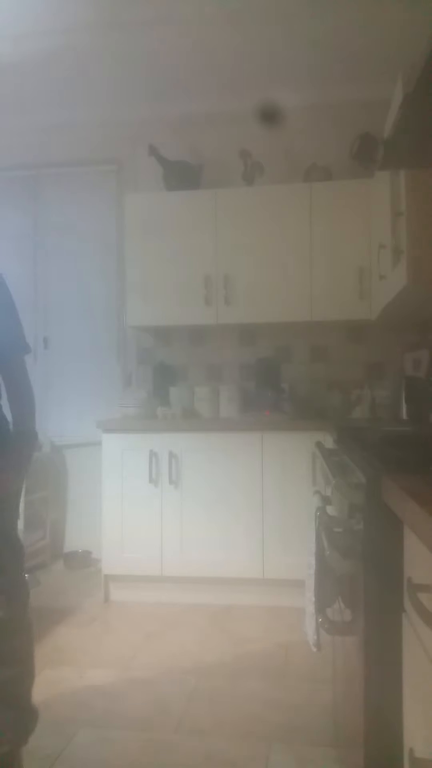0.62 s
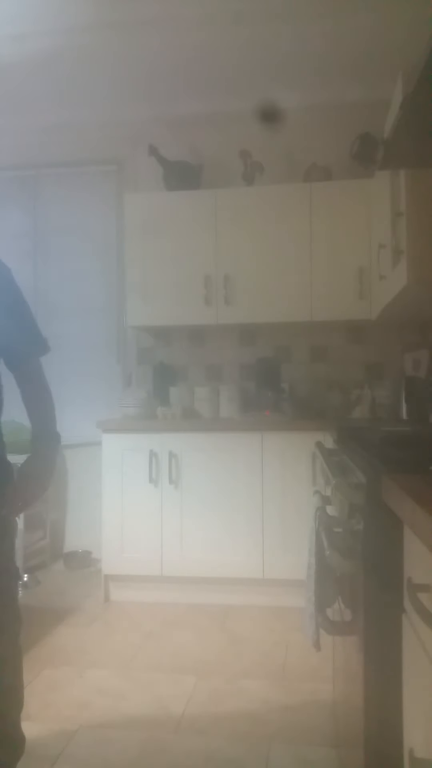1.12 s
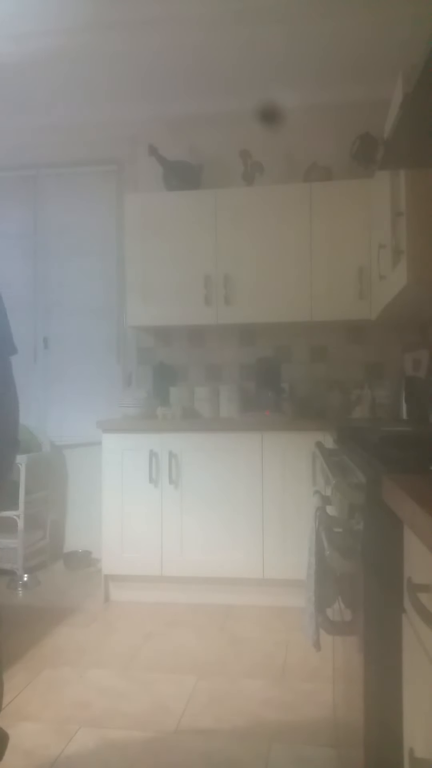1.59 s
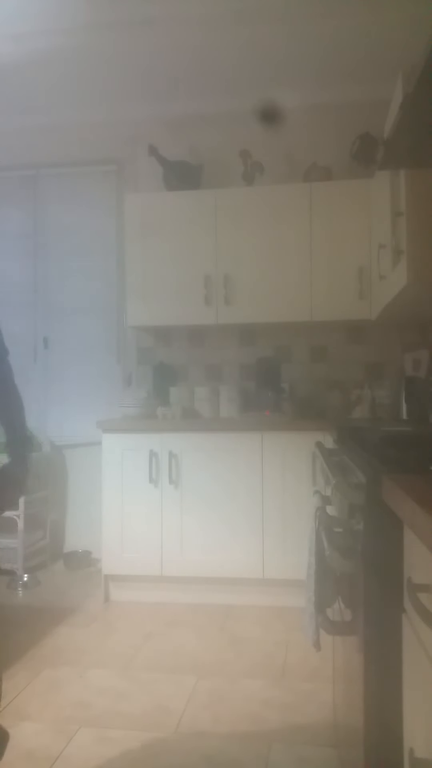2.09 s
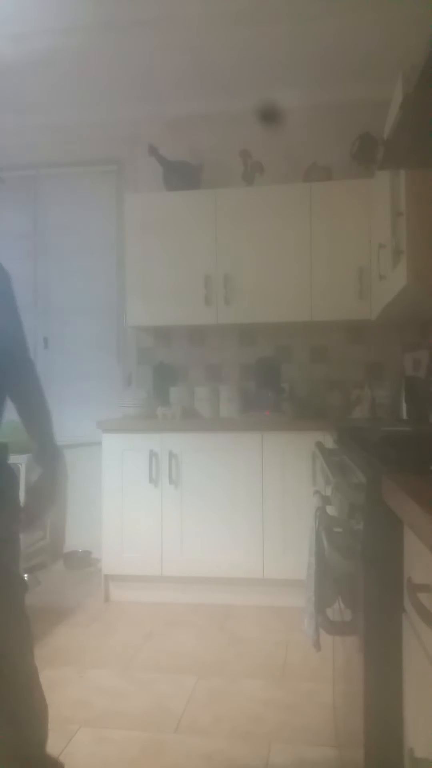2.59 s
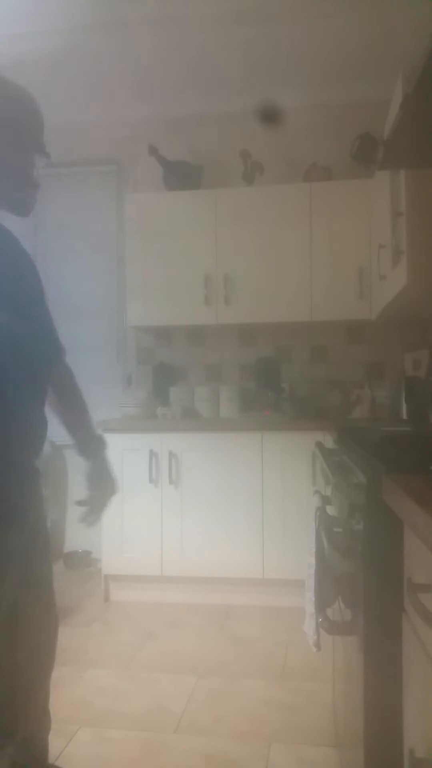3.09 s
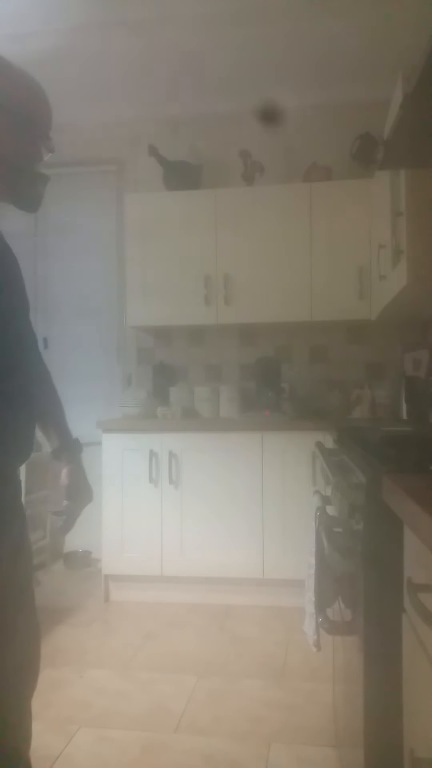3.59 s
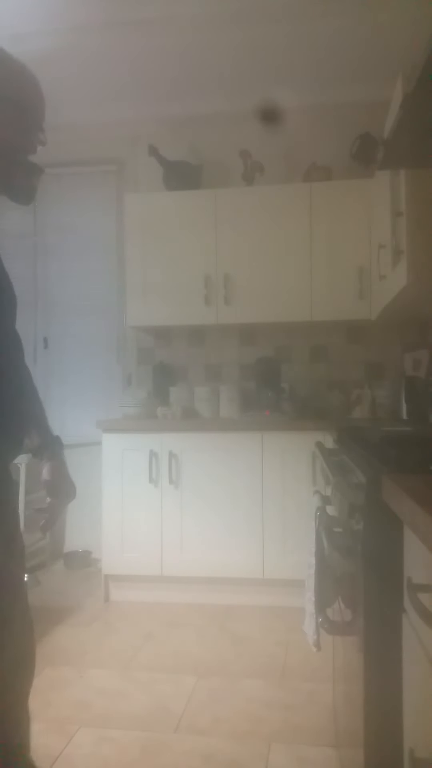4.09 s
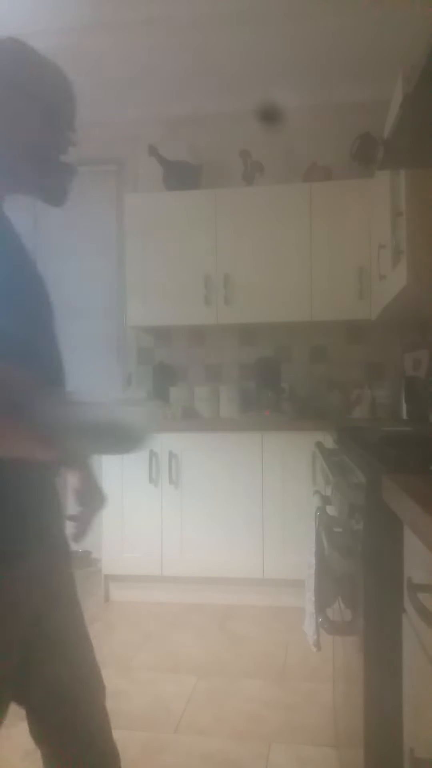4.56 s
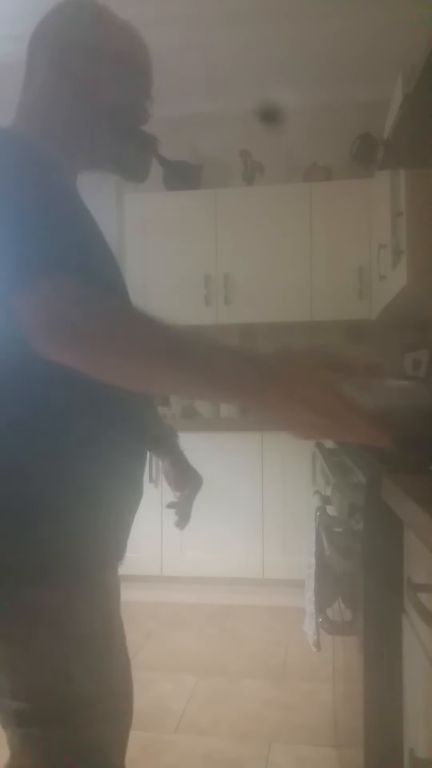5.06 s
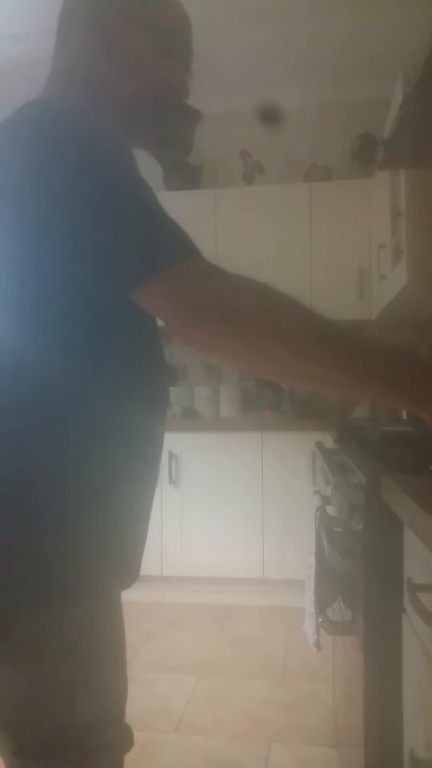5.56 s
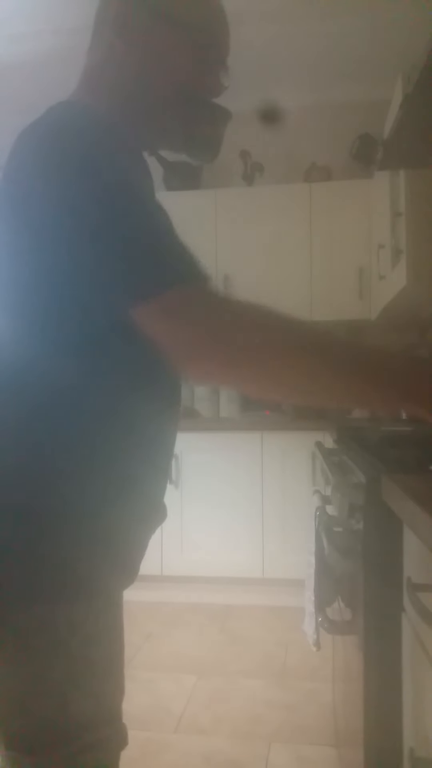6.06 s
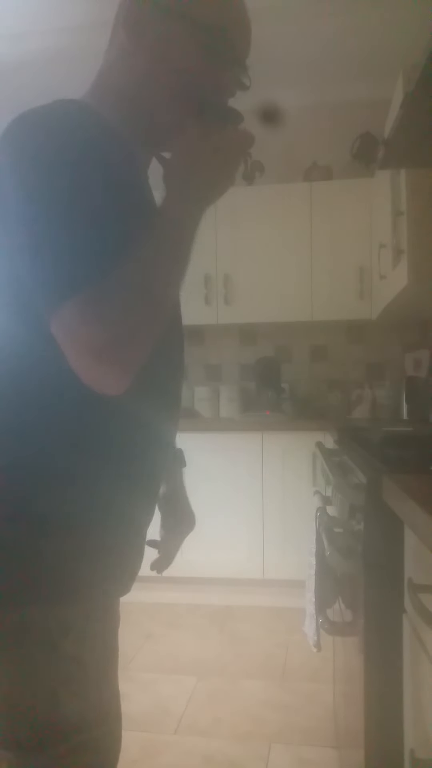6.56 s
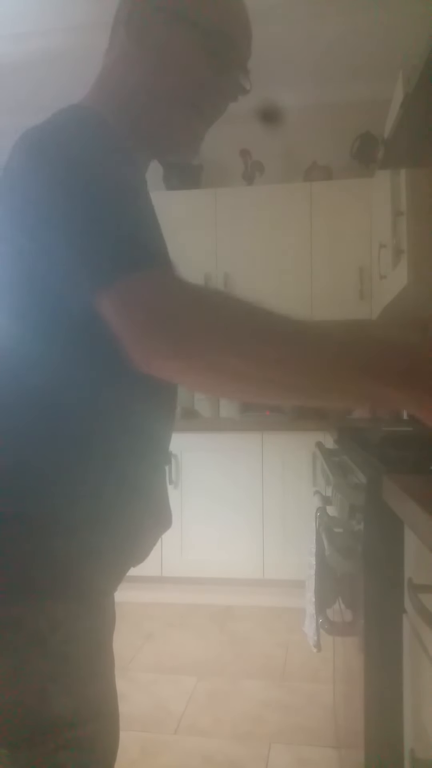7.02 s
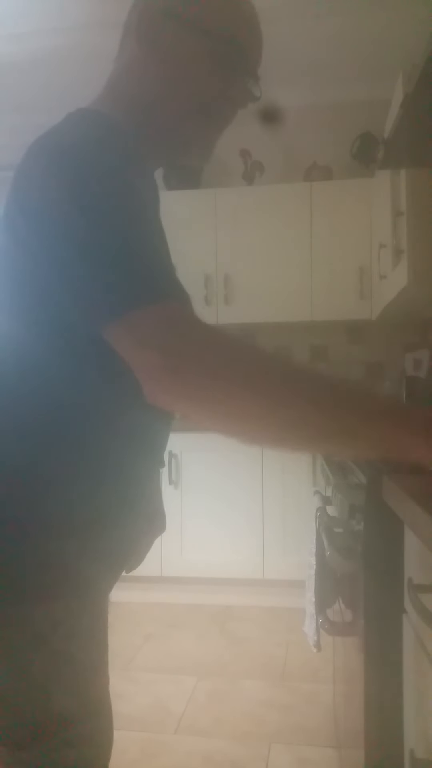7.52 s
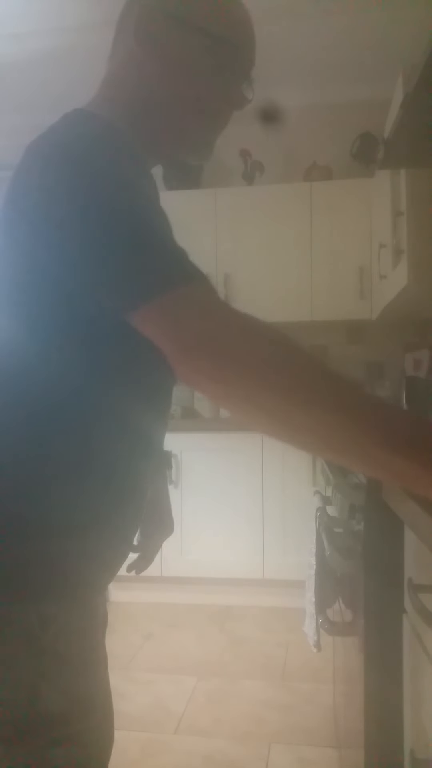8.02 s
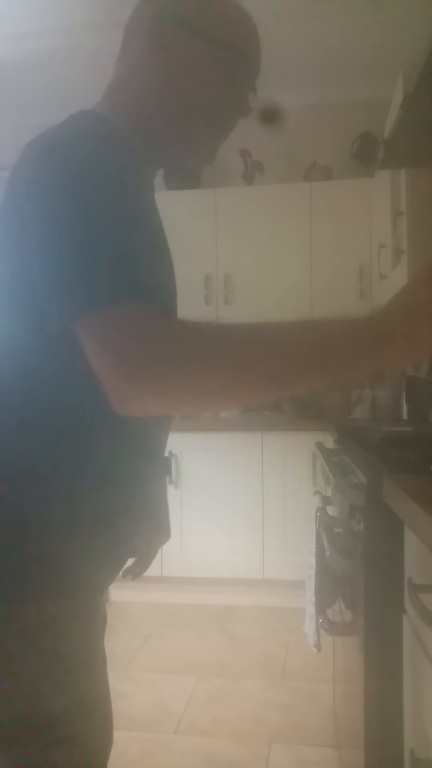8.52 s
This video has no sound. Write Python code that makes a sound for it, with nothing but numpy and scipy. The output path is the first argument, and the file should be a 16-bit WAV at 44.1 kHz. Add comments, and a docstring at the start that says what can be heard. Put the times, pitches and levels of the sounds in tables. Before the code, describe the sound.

In a quiet, echoey kitchen, three heel-and-sole strides approach, a dish lands ringing on the counter, a finger is sucked, and a utensil chatters.

```python
"""Room tone and microphone hiss fill a small tiled kitchen, with a thin high tick every 0.85 s.
Hard-soled shoes pace it, heel then sole, for three strides; two light taps and a far hollow knock fall
between. At the worktop a dull piece and a ringing dish are set down, a finger is sucked clean with four more
taps just before and during it, then a hand brushes the board and a utensil chatters among small blows.
Soft rubbing swells: cloth with body moves, at 8.04 s something sliding on the worktop. The phone stands
on that worktop, so blows reach it through the board too; bare walls ring on."""
import sys
import numpy as np
from scipy import signal
from scipy.fft import rfft, irfft
from scipy.io import wavfile
from scipy.ndimage import uniform_filter1d, minimum_filter1d

SR = 44100
rng = np.random.default_rng(int(sys.argv[2]) if len(sys.argv) > 2 else 0)


def gain_from_db(level_db):
    """Convert decibel levels to linear amplitude factors (20 dB per decade)."""
    decades = np.asarray(level_db, float) / 20
    return 10 ** decades


def wrap_up_sound(samples):
    """Save the sound to the file named by the first command line argument, as 16-bit audio."""
    columns = np.atleast_2d(samples).T
    # keep every value between -1 and 1, then stretch to whole-number steps
    tamed = np.clip(columns, -1, 1)
    steps = np.round(tamed * 32767).astype(np.int16)
    wavfile.write(sys.argv[1], SR, steps)


N = 381010  # samples in the scene
LONG = 2 ** 15  # samples in each single sound
HZ = np.fft.rfftfreq(LONG, 1 / SR)
T = np.arange(LONG) / SR

# The worktop's own modes. Each row: frequency in Hz, level in dB, t60 in s.
BOARD = [(34, -24, 0.5), (64, -12.5, .1), (99.3, 4.5, 0.091)]


def unit(x):
    """Scaled to rms 1."""
    return x / np.sqrt(np.mean(x ** 2) + 1e-20)


def along(points, hz):
    """Reads a curve of (Hz, value) points on a log frequency axis."""
    f, v = np.transpose(points)
    return np.interp(np.log(hz + 1), np.log(f + 1), v)


def causal(db):
    """Minimum-phase response with the given dB curve, by folding its cepstrum."""
    cepstrum = irfft(np.maximum(db, -120) * np.log(10) / 20, LONG)
    cepstrum[1:LONG // 2] *= 2
    cepstrum[LONG // 2 + 1:] = 0
    return np.exp(rfft(cepstrum))


def resonances(peaks):
    """Causal sum of (Hz, width in Hz, dB) peaks of alternating sign, falling steeply above 5400 Hz."""
    total = 0
    for k, (centre, width, db) in enumerate(peaks):
        damping = 1j * HZ * width
        total = total + (-1) ** k * gain_from_db(db) * damping / (centre * centre - HZ * HZ + damping)
    return total * causal(-50 * np.log2(np.maximum(HZ / 5400, 1)))


def hardness(db):
    """A harder contact is brighter: a tilt in dB per octave from 400 to 5000 Hz."""
    return db * np.log2(np.clip(HZ, 400, 5000) / 400)


def coloured(push, db):
    """A push through a dB spectrum, peak 1."""
    x = irfft(rfft(push) * causal(db), LONG)
    return x / np.abs(x).max()


def contact(length, bite=0.0012):
    """An uneven push that swells over bite seconds and dies over length seconds, even in spectrum; energy 1."""
    grain_db = 2.5  # rms unevenness
    shape = (1 - np.exp(-(T / bite) ** 2)) * np.exp(-T / length)
    shape *= gain_from_db(grain_db * unit(uniform_filter1d(rng.standard_normal(LONG), size=90)))
    push = rng.standard_normal(LONG) * shape
    # flatten the spectrum and restore the shape in turn
    for _ in range(8):
        z = rfft(push)
        even = irfft(z / np.abs(z), LONG)
        local_power = np.abs(uniform_filter1d(even ** 2, size=128, mode="wrap"))
        push = shape * even / np.sqrt(local_power + 1e-12)
    return push / np.linalg.norm(push)


def ring(modes, scatter_db, waver_db=0):
    """Decaying modes struck at new strengths, each wavering if the piece rocks; peak 1."""
    strength = scatter_db * rng.standard_normal(len(modes))
    drift = rng.standard_normal((len(modes), LONG))
    for _ in range(2):
        drift = uniform_filter1d(drift, size=500)
    luck = strength[:, None] + waver_db * unit(drift)
    x = np.zeros(LONG)
    for (hz, db, t60), luck_db in zip(modes, luck):
        x += gain_from_db(db + luck_db - 60 * T / t60) * np.sin(2 * np.pi * hz * T)
    return x / np.abs(x).max()


def slide(length):
    """Gritty friction that swells for length seconds and dies away."""
    # Spectrum of a sole or hand sliding. Each row: frequency in Hz, level in dB.
    grit = [(1000, -0.5), (3000, 1), (5500, -10), (6500, -20), (11000, -16), (15000, -16.5)]
    friction = unit(coloured(rng.standard_normal(LONG), along(grit, HZ)))
    return friction * (T / length * np.exp(1 - T / length)) ** 2


def pair(noise, hz, lean):
    """Two unrelated spectra mixed to a stereo pair, alike in the bass; lean is left over right in dB."""
    # How alike the two channels are. Each row: frequency in Hz, likeness from 0 to 1.
    alike = [(70, 1), (150, .9), (400, .6), (1000, .15), (4000, .05)]
    turn = np.arccos(np.clip(along(alike, hz), 0, 1)) / 2
    mid, side = noise[0] * np.cos(turn), noise[1] * np.sin(turn)
    tilt = gain_from_db(along(lean, hz) / 2)
    return np.array([(mid + side) * tilt, (mid - side) / tilt])


def add(out, s, x, wet_db, aside=1):
    """Places a sound at s seconds with a fresh kitchen tail, each frequency dying at its own speed."""
    # Reverberation of the bare walls. Each row: frequency in Hz, t60 in s.
    kitchen = [(60, 0.74), (250, 0.22), (700, 0.56), (2000, 0.54), (5000, 0.51), (12000, 0.24)]
    # Lean of near sounds, before aside scales it. Each row: frequency in Hz, left over right in dB.
    near_lean = [(125, 1), (300, -0.5), (1000, -6), (2100, -4.5), (3300, -4.5), (5000, 9)]
    lean = [(f, aside * db) for f, db in near_lean]
    hz, t, z = signal.stft(rng.standard_normal((2, LONG)), SR, nperseg=256)
    decay = gain_from_db(-60 * t / along(kitchen, hz)[:, None])
    tail = signal.istft(z * decay, SR, nperseg=256)[1][:, :LONG]
    tail *= 1 - np.exp(-T / 0.0007)  # echoes thicken as the walls answer
    room = gain_from_db(wet_db) * pair(rfft(tail / np.linalg.norm(tail[0])), HZ, lean)
    direct = gain_from_db(np.outer([.5, -.5], along(lean, HZ)))
    # the left port lies a little further off: 0.1 ms
    direct = direct * np.exp(-2j * np.pi * np.outer([.0001, 0], HZ))
    y = irfft(rfft(x) * (direct + room), LONG)
    at = round(s * SR)
    out[:, at:at + LONG] += y * np.minimum(1, (LONG - np.arange(LONG)) / 4000)  # fade the end out


def wash(spectrum, lean, patchy_db):
    """Stereo noise of rms 1 with patches of random gain in time and frequency."""
    hz, _, z = signal.stft(rng.standard_normal((2, N)), SR, nperseg=1024)
    field = uniform_filter1d(rng.standard_normal(z.shape[1:]), size=14, axis=0)
    field = uniform_filter1d(field, size=4, axis=1)
    z = z * gain_from_db(patchy_db * unit(field) + along(spectrum, hz)[:, None])
    return unit(signal.istft(pair(z, hz[:, None], lean), SR, nperseg=1024)[1][:, :N])


def room_tone():
    """Steady shaped noise: the room's tone and the microphone's hiss."""
    # Spectrum of the hush. Each row: frequency in Hz, level in dB.
    hush = [(20, -23), (40, -29.5), (107, -5), (145, -14.5), (181, -9.5), (308, -15.5), (710, -19),
            (2360, -18.5), (7190, -32.5), (10900, -26.5), (15700, -30.5)]
    # Stereo lean of the hush. Each row: frequency in Hz, left over right in dB.
    hiss_lean = [(60, 22.5), (240, -6), (950, -7), (3770, 3.5), (15000, 4)]
    return gain_from_db(-69.5) * wash(hush, hiss_lean, patchy_db=1.0)


def high_tick():
    """A thin 10850 Hz tone that swells and dies at a fixed period."""
    # The tick: first time in seconds, period in seconds, peak in dB.
    first, period, tick_db = (0.96, 0.85, -83.5)
    t = np.arange(N) / SR
    from_peak = (t - first + period / 2) % period - period / 2
    swell = gain_from_db(tick_db) * np.exp(-np.abs(from_peak) / 0.053) * (t > period / 2)
    return swell * np.sin(2 * np.pi * 10850 * t)


def soft_rubbing():
    """Patchy noise that swells up to each rub, holds and fades after it."""
    # Spectrum of the rubbing. Each row: frequency in Hz, level in dB.
    rubbing = [(88, -24), (150, -8.5), (276, -3), (406, 1.5), (1020, -6), (1450, -2.5), (7000, -24),
               (15400, -120)]
    # Swells of soft rubbing: cloth with body moves, then at 8.04 s something sliding on the worktop.
    # Each row: full from in seconds, full until in seconds, level in dB.
    rubs = [(0.783, 1.414, -66.5), (2.558, 3.503, -67.5), (4.39, 5.377, -69), (5.716, 7.47, -74),
            (8.043, 8.13, -66)]
    swell_db_per_s, fade_db_per_s = 15, 49.5
    t = np.arange(N) / SR
    level = np.zeros(N)
    for start, end, db in rubs:
        before, after = np.maximum(start - t, 0), np.maximum(t - end, 0)
        level += gain_from_db(db - swell_db_per_s * before - fade_db_per_s * after)
    return level * wash(rubbing, [(100, -1)], patchy_db=2.5)


def taps(out):
    """Light contacts with two short notes each, excited by a brief push."""
    # Light taps. Each row: start in seconds, peak in dB, first note in Hz, second note in Hz.
    tap_list = [(1.46, -62, 512, 1010), (3.695, -56, 1190, 2480), (6.495, -46, 1390, 2250),
                (6.598, -48, 1200, 1610), (6.653, -52, 1600, 2600), (6.703, -64, 3630, 4300)]
    for s, db, hz, second_hz in tap_list:
        notes = resonances([(hz, 150, 0), (second_hz, 150, -2), (3000, 2500, -16)])
        x = irfft(rfft(contact(0.0075, 0.0019)) * notes, LONG)
        add(out, s, gain_from_db(db) * x / np.abs(x).max(), wet_db=-2)


def far_knock(out):
    """One distant hollow knock: short modes under a brief push, heard mostly as room."""
    # Modes of the hollow body. Each row: frequency in Hz, level in dB, t60 in s.
    hollow = [(476, 0, 0.13), (767, -1, 0.012), (1168, -2, 0.01), (1610, -10, 0.02), (2500, -5, 0.008)]
    # The knock: start in seconds, peak in dB.
    s, db = (4.226, -48)
    x = irfft(rfft(ring(hollow, scatter_db=1)) * rfft(contact(0.003)), LONG)
    add(out, s, gain_from_db(db) * x / np.abs(x).max(), wet_db=11.5)


def suck(out):
    """Lips flutter unevenly round the finger through mouth resonances; air rushes through the gap."""
    # Level curve. Each row: time in seconds, lips in dB, inrush in dB.
    s, lips_db, inrush_db = np.transpose([(6.673, -69, -101), (6.691, -51.5, -59.5), (6.757, -58, -77),
                                          (6.774, -53, -41), (6.813, -51.5, -49.5), (6.899, -67.5, -61.5)])
    # Mouth resonances. Each row: frequency in Hz, width in Hz, level in dB.
    mouth = [(219, 12, -5), (482, 27, -1.5), (801, 54, -3.5), (1310, 185, -8.5)]
    # Air between lips and finger. Each row: frequency in Hz, width in Hz, level in dB.
    gap = [(1680, 144, 1), (1950, 66.5, 7.5), (2250, 82, 3.5), (2543, 97, 0), (3380, 220, -7),
           (4140, 180, -7), (4430, 105, -9), (5200, 100, -16)]
    t = T + s[0]
    # about 900 random pulses a second
    flutter = rng.standard_normal(LONG) * (rng.random(LONG) < 900 / SR)
    # noise with sparse stronger spikes
    inrush = rng.standard_normal(LONG) * (0.38 + (rng.random(LONG) < .03))
    x = np.zeros(LONG)
    for source, peaks, db in ((flutter, mouth, lips_db), (inrush, gap, inrush_db)):
        voiced = unit(irfft(rfft(source) * resonances(peaks), LONG))
        x += voiced * gain_from_db(np.interp(t, s, db, right=-150))
    add(out, s[0], x, wet_db=-0.5)


def crockery(out):
    """Crockery rings in decaying modes and the board booms under its weight; the dish's long note swells in."""
    # The duller piece lands, then the dish. Each row: start in seconds, ring in dB, boom in dB.
    clinks = [(5.696, -27, -18), (6.019, -23, -24)]
    # Modes of the duller piece. Each row: frequency in Hz, level in dB, t60 in s.
    dull_piece = [(2500, 0, .06), (2930, 0, .05), (3100, -4, .04), (4450, -7, .04), (4570, -9, .08),
                  (6320, -27, .12), (7630, -26, .08)]
    # Modes of the dish. Each row: frequency in Hz, level in dB, t60 in s.
    dish = [(2422, -8, .3), (2498, 2, .42), (2745, 0, .12), (4651, -19, .15), (4904, -17, .2)]
    # The worktop board ringing under the laden dish. Each row: frequency in Hz, level in dB, t60 in s.
    boom_modes = [(169.5, 10.5, 0.3), (187, -5, 0.81), (234.8, 1.5, 0.25)]
    # The dish's long note as it settles: frequency in Hz, level in dB, t60 in s, swell in s.
    hz, db, t60, swell = (2116, -30, .7, .055)
    rise = 1 - np.exp(-(T / 0.001) ** 2)
    for piece, (s, ring_db, boom_db) in zip((dull_piece, dish), clinks):
        tone = ring(piece, scatter_db=1, waver_db=2)
        boom = ring(boom_modes, scatter_db=1)
        add(out, s, rise * (gain_from_db(ring_db) * tone + gain_from_db(boom_db) * boom), wet_db=-5.0)
    hum = ring([(hz, 0, t60)], scatter_db=0, waver_db=2.0) * (1 - np.exp(-(T / swell) ** 2))
    dish_s = clinks[-1][0]
    add(out, dish_s, gain_from_db(db) * hum, wet_db=-31.0)


def utensil(out):
    """A damped utensil chinks and chatters on: its short modes answer a dying burst of random touches."""
    # Modes of the utensil. Each row: frequency in Hz, level in dB, t60 in s.
    tool_modes = [(1170, 1.5, .02), (1510, 2.5, .025), (2160, 0.5, .02), (3070, -6, .02), (3710, -5, .02),
                  (4160, -17, .03), (4930, -18, .05), (8120, -38, .06), (11450, -41, .06)]
    # Its touches. Each row: start in seconds, level in dB, hardness in dB per octave.
    rattles = [(7.72, -29, 1.5), (7.792, -41.5, 4.5), (7.859, -10.5, 0), (7.884, -14, -1),
               (8.213, -63, 9.5), (8.245, -29.5, 1.5)]
    chatter_s, chatter_per_s = 0.017, 540
    rise = 1 - np.exp(-(T / 0.001) ** 2)
    for s, db, hard_db in rattles:
        touches = rng.standard_normal(LONG) * (rng.random(LONG) < chatter_per_s / SR)
        touches *= np.exp(-T / chatter_s)
        touches[0] = 1
        touches /= np.linalg.norm(touches)
        chink = rfft(rise * ring(tool_modes, scatter_db=3.5))
        x = irfft(chink * rfft(touches) * causal(hardness(hard_db)), LONG)
        add(out, s, gain_from_db(db) * x, wet_db=-10.0)


def worktop(out):
    """Each blow clacks, knocks the cupboard and shakes the board under the phone; a hand brushes by."""
    # Things meeting the worktop.
    # Each row: start in seconds, clack in dB, thud in dB, knock in dB, hardness in dB per octave.
    blows = [(5.695, -4.5, -11.5, -12.5, 2), (5.927, -44, -43, -38.5, 12), (5.986, -45, -28.5, -31.5, 16),
             (6.018, -5.5, -13.5, -4.5, 2), (7.326, -42.5, -42.5, -54.5, 15.5),
             (7.429, -43, -20.5, -43.5, 20), (7.703, -45, -28, -29.5, 4.5),
             (7.714, -37.5, -12.5, -20.5, 17), (7.781, -31, -28, -33.5, -6), (7.856, -27, -18.5, -23.5, -3),
             (7.879, -24.5, -32, -23, -6), (8.075, -77, -28.5, -42.5, 4), (8.196, -58, -40, -34.5, 14.5),
             (8.241, -24.5, -33, -23.5, 2.5)]
    # Spectrum of a hard rim on laminate. Each row: frequency in Hz, level in dB.
    clack = [(290, -6.5), (551, -5.5), (1580, -4), (2350, -25), (2590, -24), (3500, -40.5), (4570, -38.5),
             (6040, -69.5), (9000, -75), (15000, -110)]
    # The cupboard under the worktop. Each row: frequency in Hz, level in dB, t60 in s.
    carcass = [(271, -17, 0.085), (400.7, -6, 0.038), (446.5, 5.5, 0.014), (636, -12, 0.022)]
    # A hand brushing the worktop. Each row: start in seconds, level in dB, swell in s.
    brushes = [(7.333, -56.5, 0.0047), (7.416, -53.5, 0.016), (7.716, -63, 0.035)]
    room_db = -3.5
    for s, clack_db, thud_db, knock_db, hard_db in blows:
        air = gain_from_db(clack_db) * coloured(contact(0.013), along(clack, HZ) + hardness(hard_db))
        # 0.6 ms at a 0 dB clack, 0.5 dB longer for each dB fainter
        knock_contact = contact(0.0006 * gain_from_db(-0.5 * clack_db))
        knock = irfft(rfft(ring(carcass, scatter_db=3)) * rfft(knock_contact), LONG)
        knock *= 1 - np.exp(-(T / 0.0031) ** 2)  # the panel takes a cycle or two to swing up
        air += gain_from_db(knock_db) * knock / np.abs(knock).max()
        add(out, s, air, room_db)
        thud = ring(BOARD, scatter_db=0.5) * (1 - np.exp(-T / 0.0087))
        add(out, s, gain_from_db(thud_db) * thud, wet_db=-9.5)
    for s, db, length in brushes:
        add(out, s, gain_from_db(db) * slide(length), room_db)


def footfall(out, s, db, colour, edge_db, contact_s, roll_s, scuff_db, slide_s):
    """A dull clop at once, a hard edge that bites later, a scuff, a wall echo and a shake of the worktop."""
    snap_db = -7.5  # a little of the hard edge snaps with the very first touch
    wall_s, wall_db = 0.0085, 0  # the nearest cupboard front throws the clop back
    shake_db = 0  # floor shaking the worktop, over the footfall
    dull = 1 / (1 + 1j * HZ / 900) ** 2
    bright = 1 - dull ** 2
    response = causal(colour)
    clop = irfft(response * (dull ** 2 + gain_from_db(snap_db) * bright), LONG)
    edge = irfft(rfft(contact(contact_s, roll_s)) * response * bright, LONG)
    peak = np.abs(clop).max()
    blow = (clop + gain_from_db(edge_db) * edge) / peak
    add(out, s, gain_from_db(db) * blow + gain_from_db(scuff_db) * slide(slide_s), wet_db=6.5, aside=0.84)
    add(out, s + wall_s, gain_from_db(db + wall_db) * clop / peak, wet_db=-30)
    shake = ring(BOARD, scatter_db=2.5) * (1 - np.exp(-T / 0.024))  # through the floor into the worktop
    add(out, s, gain_from_db(db + shake_db) * shake, wet_db=-15.5)


def steps(out):
    """The heel lands with a dull clop that lifts a note of the tile, the sole follows with a brighter slap."""
    # The strides.
    # Each row: heel in seconds, sole in seconds, heel clop in dB, sole clop in dB, tile note in Hz.
    strides = [(0.8656, 1.169, -24.5, -30.5, 1386), (2.714, 3.027, -24.5, -27.5, 1680),
               (4.727, 5.035, -24.5, -26, 1510)]
    # Spectrum of the heel on tile. Each row: frequency in Hz, level in dB.
    heel = [(55, -49.5), (91, -10.5), (216, 3), (382, -2.5), (568, -14), (760, -19.5), (1030, -30.5),
            (1690, -30.5), (2800, -43.5), (6140, -71), (15000, -90)]
    # Spectrum of the sole slapping flat. Each row: frequency in Hz, level in dB.
    toe = [(55, -34.5), (84, -11), (291, 10), (401, 11), (956, -9), (1420, -7), (3200, -18.5),
           (5430, -36.5), (6300, -47.5), (15000, -52.5)]
    note_db, note_width_hz = 5.5, 130
    for heel_s, sole_s, heel_db, sole_db, note_hz in strides:
        note = note_db / (1 + ((HZ - note_hz) / note_width_hz) ** 2)
        footfall(out, heel_s, heel_db, along(heel, HZ) + hardness(6) + note, edge_db=-1.5,
                 contact_s=0.016, roll_s=.02, scuff_db=-69.5, slide_s=.12)
        footfall(out, sole_s, sole_db, along(toe, HZ) + hardness(3.5), edge_db=-0.5,
                 contact_s=0.012, roll_s=.003, scuff_db=-62, slide_s=.04)


def scene():
    """All sources in the kitchen."""
    out = np.zeros((2, N + LONG))
    for source in (taps, far_knock, suck, crockery, utensil, worktop, steps):
        source(out)
    return out[:, :N] + room_tone() + high_tick() + soft_rubbing()


def low_pass(x):
    """Removes everything above the highest recorded frequency."""
    return signal.sosfilt(signal.butter(12, 15720, fs=SR, output="sos"), x)


def record(dry):
    """The microphone loses the bass below 28 Hz and a limiter holds the loudest peaks."""
    ceiling = 0.93
    dry = signal.sosfilt(signal.butter(2, 28, "high", fs=SR, output="sos"), dry)
    need = np.minimum(1, ceiling / (np.abs(dry).max(0) + 1e-9))
    # hold the lowest gain for 10 ms, then smooth it over 5 ms
    gain = uniform_filter1d(minimum_filter1d(need, size=440), size=220)
    mix = dry * gain - 0.0005  # the input stage rests slightly below zero
    return low_pass(mix)


dry = scene()
out = record(dry)
wrap_up_sound(out)
```